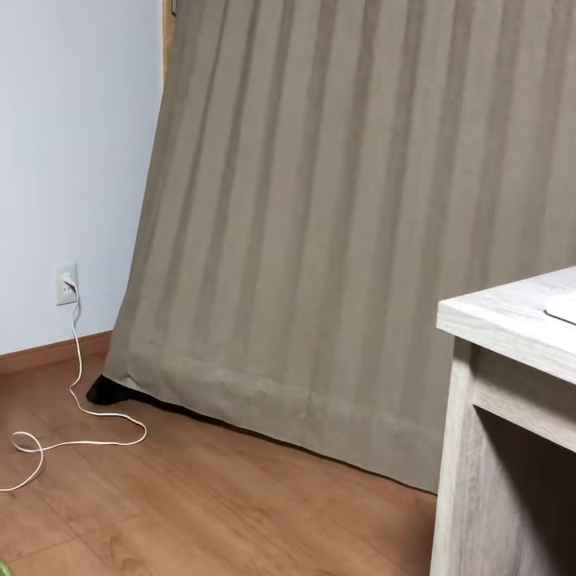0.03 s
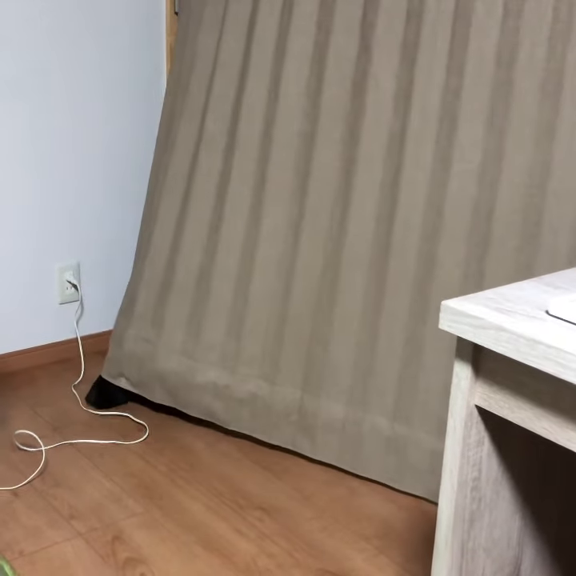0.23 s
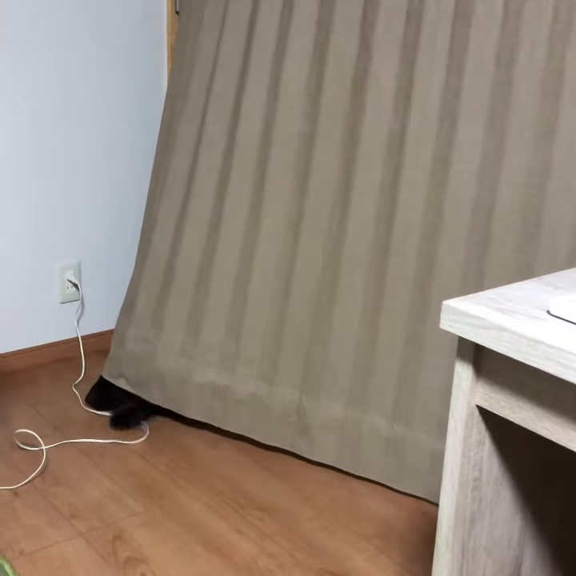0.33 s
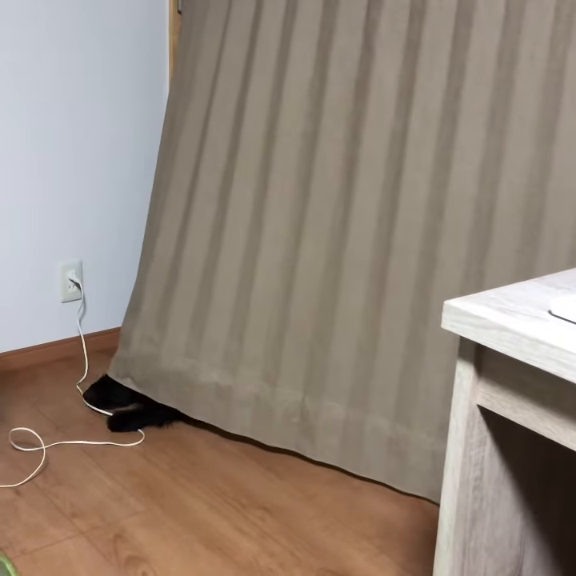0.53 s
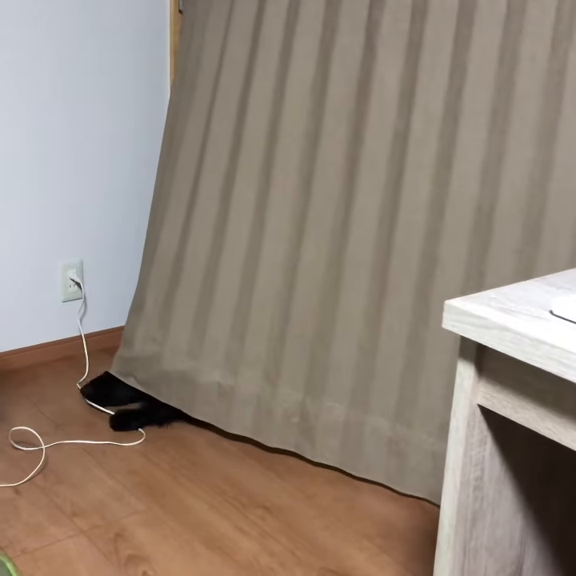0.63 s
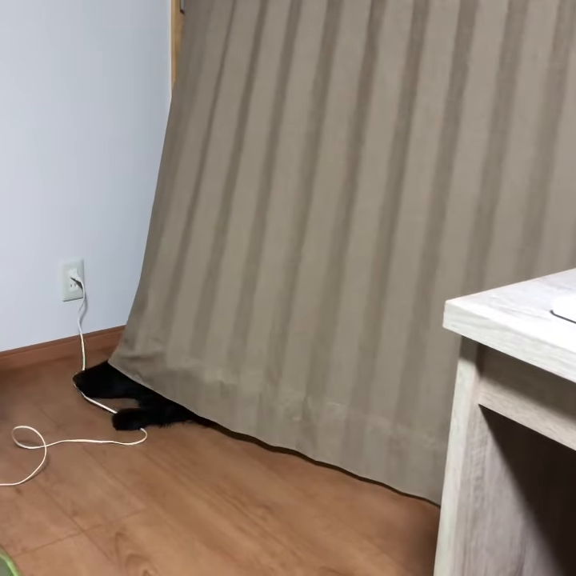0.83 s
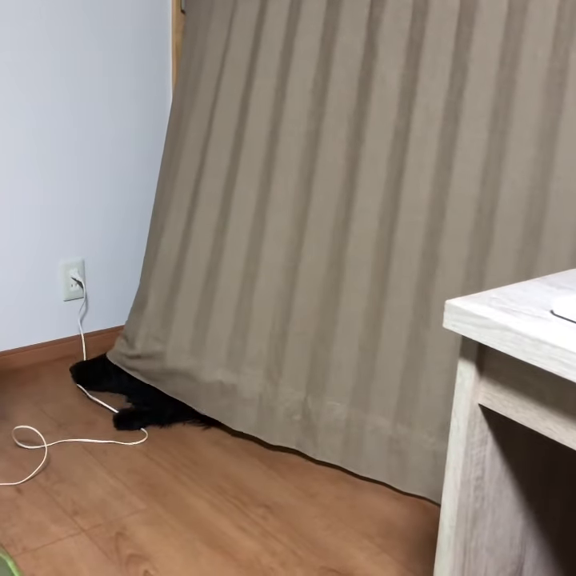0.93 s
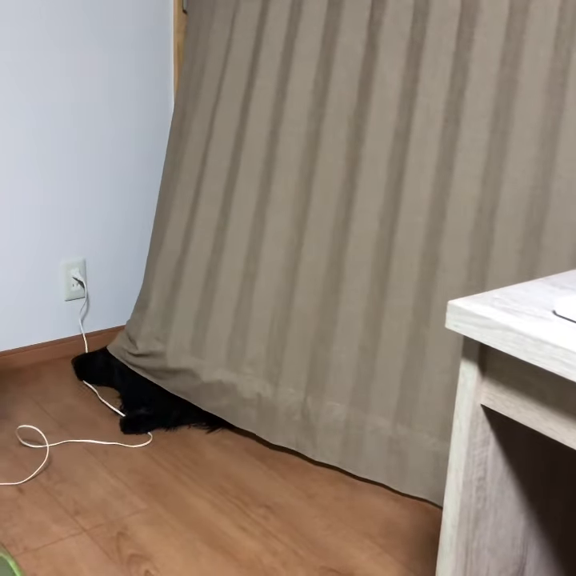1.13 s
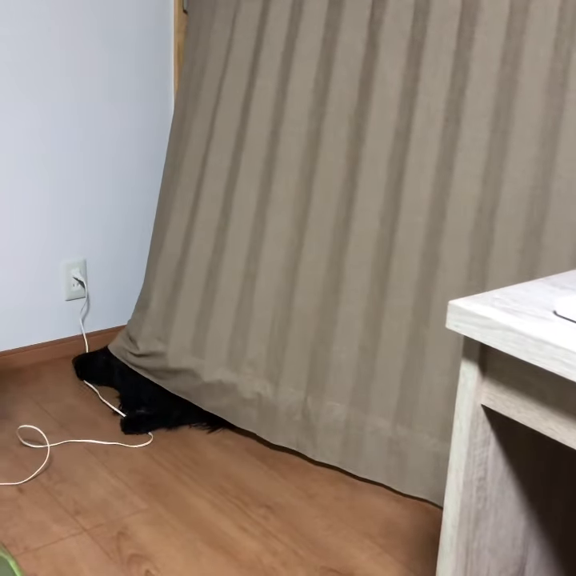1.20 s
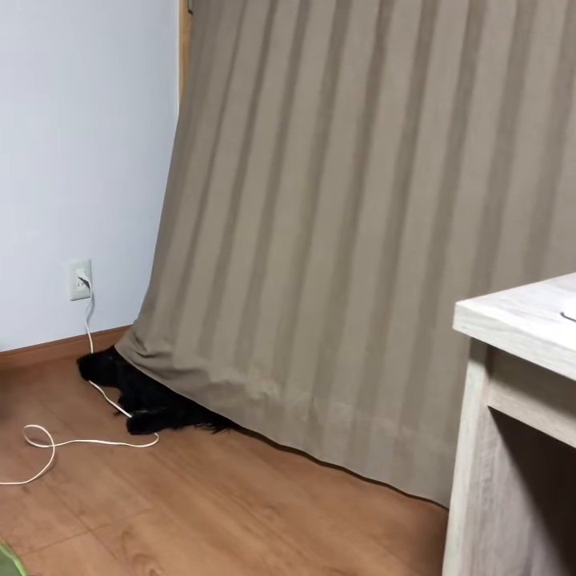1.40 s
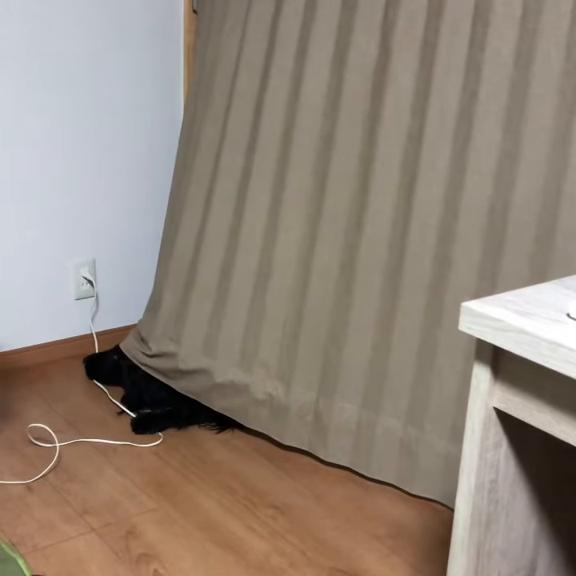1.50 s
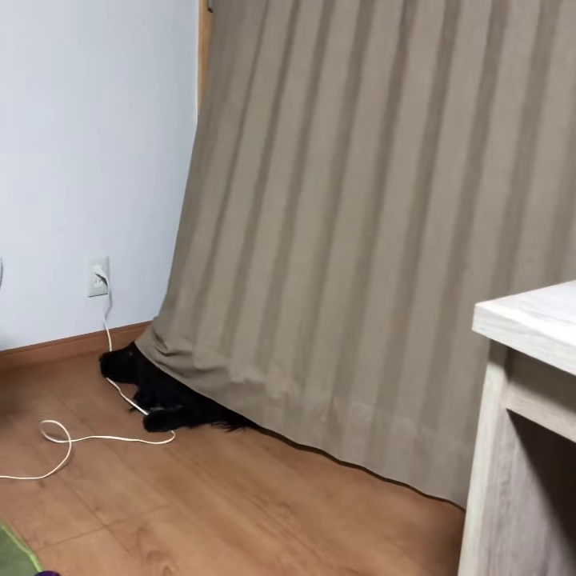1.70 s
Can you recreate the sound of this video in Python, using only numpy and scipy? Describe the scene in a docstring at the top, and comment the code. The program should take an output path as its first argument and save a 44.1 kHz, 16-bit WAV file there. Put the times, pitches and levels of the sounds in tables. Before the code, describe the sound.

Soft curtain rustling and low rubbing come from a dog squeezing under the cloth, close to the microphone in a quiet room. A sharp clack with a short rattle stands out, then gentle floor bumps, swishes and one paw step.

```python
"""A dog shoves its way under a heavy pleated curtain, heard from one microphone nearby in a small
room with a wooden floor. Cloth drags over its coat, folds swish and shudder, paws scuff, and its
body rubs and bumps the boards. Something hard behind the curtain is knocked with one sharp clack
and rattles briefly. A paw lands at the end; quiet room tone lies under it all."""
import sys
import numpy as np
from scipy import signal
from scipy.fft import rfft, irfft
from scipy.io import wavfile
from scipy.ndimage import uniform_filter1d

SR = 44100
rng = np.random.default_rng(int(sys.argv[2]) if len(sys.argv) > 2 else 0)


def pcm_store(signal):
    """Save signal as 16-bit PCM."""
    levels = np.round(np.clip(np.atleast_2d(signal), -1, 1) * 32767)
    wavfile.write(sys.argv[1], SR, levels.astype(np.int16).T)


N = 77175


def cloth(walls, room_db=-4, scuff_decay_s=0.011):
    """The curtain drags over the dog's coat in tiny slips; its folds swish and the paws scuff."""
    # Strength of the drag. Each row: time in seconds, level in dB.
    drag_levels = [(0, -54.5), (0.06, -60.5), (0.11, -58), (0.16, -65), (0.25, -61.5), (0.32, -61.5),
                   (0.37, -52.5), (0.6, -64.5), (0.65, -62), (0.71, -69), (0.755, -58.5), (0.85, -61.5),
                   (0.97, -56.5), (1.02, -60), (1.13, -53.5), (1.21, -61), (1.26, -74), (1.75, -95)]
    # Spectrum of sliding cloth. Each row: frequency in Hz, relative level in dB.
    spectrum = [(100, -5.5), (300, -2), (600, 2.5), (1100, 1), (2000, -2.5), (4000, -5.5), (6500, -10.5),
                (9000, -14.5), (15500, -17)]
    # Swishing folds. Each row: peak time and half width in seconds, level in dB, band centre in Hz,
    # fall away from it in dB per octave squared.
    swishes = [(0.203, 0.027, -53.5, 2490, 0.1), (0.225, 0.011, -46, 2240, 2),
               (0.939, 0.043, -53.5, 1000, 0.5), (1.31, 0.026, -53, 3500, 0.15),
               (1.31, 0.026, -64.5, 14000, 2), (1.325, 0.023, -57, 694, 3), (1.526, 0.021, -61.5, 6000, 0),
               (1.535, 0.016, -57.5, 950, 4.5), (1.745, 0.042, -57, 1200, 0.2)]
    # Paw scuffs. Each row: start in seconds, level in dB, band centre in Hz.
    scuffs = [(0.333, -51.5, 890), (1.692, -43.5, 450)]
    t = seconds()
    out = gain_curve(drag_levels) * through(friction(), colour(spectrum))
    for peak, width, db, hz, fall_db in swishes:
        swell = undb(db) * np.exp(-((t - peak) / width) ** 2)
        out += swell * through(friction(), colour(spectrum, hz, fall_db))
    for start, db, hz in scuffs:
        scuff = np.exp(-t / scuff_decay_s) * friction()
        out += undb(db) * delay(through(scuff, colour(spectrum, hz, fall_db=3)), start)
    return (out + undb(room_db) * through(out, walls)) / np.hypot(1, undb(room_db))


def curtain_shudder():
    """The hanging curtain trembles around one deep pitch as it is shoved."""
    # Shudders. Each row: start and length in seconds, level in dB.
    shudders = [(0.407, 0.068, -41.5), (0.522, 0.045, -43.5), (0.697, 0.17, -51), (0.88, 0.047, -57)]
    return tremble(shudders, hz=59.2, attack_s=0.0053, release_s=0.048)


def clacks(gain_db=-5, ring_db=-12, buzz_decay_s=0.0031, buzz_lag_s=0.0001):
    """Each hard contact is a clean snap and a brief buzz, with the object's ring and the room's echo."""
    # Clack, rattle and claws. Each row: start in seconds, relative level in dB, band centre in Hz,
    # fall away from it in dB per octave squared (sign ignored), buzz and room in dB against the snap.
    contacts = [(0.2073, -21.5, 1260, 6, 6, 0.5), (0.3334, -37, 9000, 2.5, 3, 5),
                (0.3928, 3, 5170, 0.5, -1, 1.5), (0.3950, -1, 3280, 0.5, -4, 0),
                (0.3994, -5.5, 4480, -0.04, -7, 0), (0.4035, -7, 2800, 0.5, 0.5, -1.5),
                (0.4114, -5.5, 5800, 0.7, 3, -0.5), (0.453, -8, 5570, 1.5, -4, -4),
                (0.4556, -15, 3400, 2, 0, -2), (0.5122, -13, 11500, 1.6, 0, -1.5),
                (0.5171, -16, 2300, 2.8, 4, 2.5), (1.174, -30.5, 3830, 9, 1, 5),
                (1.6908, -31.5, 2010, 0.8, 5, 3.5)]
    # Modes of the knocked object. Each row: frequency in Hz, relative level in dB, t60 in seconds.
    object_modes = [(1130, 0, 0.14), (3312, -0.5, 0.22), (3740, -2, 0.18), (5385, -5, 0.16),
                    (6810, -5, 0.13)]
    # Spectrum of a hard contact. Each row: frequency in Hz, relative level in dB.
    spectrum = [(60, -8.5), (280, 3), (480, 6.5), (720, -7.5), (1100, 1.5), (1500, -0.5), (2000, -6),
                (2500, -1), (3300, -0.5), (3800, 0.5), (4400, -2.5), (5300, 1), (7000, -4.5), (9500, -10),
                (15500, -12)]
    t, ringing, out = seconds(), ring(object_modes), 0
    snap = t == 0
    for start, db, hz, fall_db, buzz_db, room_db in contacts:
        buzz = unit_energy(np.exp(-t / buzz_decay_s) * rng.standard_normal(N))
        contact = unit_energy(snap + undb(buzz_db) * delay(buzz, buzz_lag_s))
        at_mic = contact + undb(ring_db) * ringing + undb(room_db) * room()
        out += undb(db) * delay(through(at_mic, colour(spectrum, hz, fall_db)), start)
    return undb(gain_db) * out


def floor_bumps(walls, gain_db=-32.5, boom_db=0.5, room_db=-7, rise_cycles=0.64):
    """The dog's soft bumps and the low thump under the clack set the boards booming."""
    # Bumps and thump. Each row: start in seconds, relative level in dB, pitch of the swing in Hz.
    bumps = [(0.211, -5.5, 180), (0.229, -8.5, 178.3), (0.393, -5, 442), (0.398, 3, 258),
             (0.416, -5.5, 157), (0.440, -3.5, 162), (0.703, -10, 142), (0.723, -11, 110),
             (0.769, -5.5, 174), (0.797, -6.5, 145), (0.848, -14.5, 122), (1.694, -9, 291)]
    # Modes of boards and room. Each row: frequency in Hz, relative level in dB, t60 in seconds.
    board_modes = [(112.2, 1.5, 0.55), (159, -3.5, 0.31), (182.7, 7, 0.16), (224, 2.5, 0.059),
                   (297, -1.5, 0.43), (401, -3, 0.61), (452, 5, 0.74), (484, 9, 0.45)]
    t, boards, out = seconds(), ring(board_modes), 0
    for start, db, hz in bumps:
        age = hz * t / rise_cycles
        swing = np.sin(2 * np.pi * hz * t) * age * np.exp(1 - age)  # heavily damped
        boom = unit_energy(through(swing, boards)) * np.sqrt(np.sum(swing ** 2))
        out += undb(db) * delay(swing + undb(boom_db) * boom, start)
    return undb(gain_db) * (out + undb(room_db) * through(out, walls))


def body_rub():
    """The dog's weight slides along curtain and floor with a low rumble, juddering now and then."""
    # Strength of the rub. Each row: time in seconds, level in dB.
    rub_levels = [(0, -54.5), (0.09, -70), (0.14, -53), (0.36, -57), (0.65, -56.5), (0.95, -57.5),
                  (1.07, -58.5), (1.24, -60), (1.3, -61.5), (1.45, -69.5), (1.57, -59), (1.66, -68),
                  (1.75, -51.5)]
    # Spectrum of the rub. Each row: frequency in Hz, relative level in dB.
    spectrum = [(40, -13), (60, -18), (85, -13), (112, -1), (140, -9), (180, -1), (215, -4), (290, -12),
                (450, -16), (700, -28), (1500, -44.5)]
    # Judders on the boards. Each row: start and length in seconds, level in dB.
    judders = [(0.118, 0.05, -53), (1.02, 0.07, -57), (1.172, 0.055, -52)]
    rumble = gain_curve(rub_levels) * through(friction(), colour(spectrum))
    return rumble + tremble(judders, hz=181, attack_s=0.0066, release_s=0.03)


def friction(slips_per_s=9000, spread_db=2.5):
    """Sliding surfaces catch and let go in dense tiny slips of uneven size."""
    slips = rng.random(N) < slips_per_s / SR
    return unit_rms(slips * rng.standard_normal(N) * undb(spread_db * rng.standard_normal(N)))


def tremble(spells, hz, attack_s, release_s, waver_share=0.04, waver_db=1.8):
    """Spells of low vibration that waver in pitch and strength."""
    t, out = seconds(), 0
    for start, length, db in spells:
        attack = np.clip((t - start) / attack_s, 0, 1)
        release = np.clip(1 - (t - start - length) / release_s, 0, 1)
        pitch = hz * (1 + waver_share * drift())
        cycles = np.cumsum(pitch * (t >= start)) / SR
        out += undb(db + waver_db * drift()) * attack * release * np.sin(2 * np.pi * cycles)
    return out


def room(build_s=0.0012, echo_spread_db=4.5, merge_s=0.08, echo_samples=24):
    """Uneven reflections off the near walls merge into a diffuse tail; each octave has its own decay."""
    # Reverberation of the small room. Each row: frequency in Hz, t60 in seconds.
    decay_times = [(100, 0.35), (500, 0.33), (1500, 0.35), (4000, 0.25), (8000, 0.25), (15000, 0.27)]
    t, tail, lowest_hz = seconds(), 0, 32
    echoes = np.repeat(rng.standard_normal(N // echo_samples + 1), echo_samples)[:N].clip(-2, 2)
    unevenness = undb(echo_spread_db * echoes * np.exp(-t / merge_s))
    spectrum = rfft(rng.standard_normal(N) * unevenness)
    hz = np.arange(len(spectrum)) * SR / N
    octave = np.log2(np.clip(hz, lowest_hz, 16384) / lowest_hz)
    for k in range(10):
        band = irfft(spectrum * np.maximum(1 - abs(octave - k), 0), N)
        t60 = at_hz(decay_times, lowest_hz * 2 ** k)
        tail += band * np.exp(-np.log(1000) * t / t60)
    return unit_energy(tail * (1 - np.exp(-t / build_s)))


def room_tone(level_db=-63):
    """The quiet room around the microphone: steady noise, strongest in the bass."""
    # Spectrum of the room tone. Each row: frequency in Hz, relative density in dB.
    spectrum = [(25, -35), (60, 6), (110, -2), (250, 2), (500, -3.5), (1000, -5.5), (2000, -17),
                (5000, -20.5), (10000, -28.5), (16000, -32)]
    return undb(level_db) * through(rng.standard_normal(N), colour(spectrum))


def ring(modes):
    """Response of a struck body: a sum of decaying modes."""
    t = seconds()
    return unit_energy(sum(undb(db) * np.sin(2 * np.pi * hz * t) * np.exp(-np.log(1000) * t / t60)
                           for hz, db, t60 in modes))


def colour(spectrum, centre_hz=1000, fall_db=0, size=8192):
    """Unit-energy response with this spectrum, less fall_db per octave squared away from a centre."""
    hz = np.maximum(np.arange(size // 2 + 1) * SR / size, spectrum[0][0])
    cut_db = np.minimum(abs(fall_db) * np.log2(hz / centre_hz) ** 2, 50)
    cepstrum = irfft(np.log(undb(at_hz(spectrum, hz) - cut_db)))
    # Minimum phase: nothing sounds ahead of the contact.
    cepstrum[1:size // 2] *= 2
    cepstrum[size // 2 + 1:] = 0
    return unit_energy(irfft(np.exp(rfft(cepstrum))))


def drift(turns_per_s=45):
    """Slow random wander with rms 1."""
    hold = int(SR / turns_per_s)
    steps = np.repeat(rng.standard_normal(N // hold + 1), hold)
    return unit_rms(uniform_filter1d(steps, hold)[:N])


def gain_curve(points):
    """Gain over time from (seconds, dB) points."""
    return undb(np.interp(seconds(), *np.array(points).T))


def at_hz(points, hz):
    """Reads (Hz, value) points on a log-frequency axis."""
    freqs, values = np.array(points).T
    return np.interp(np.log(np.maximum(hz, 1)), np.log(freqs), values)


def undb(db):
    return 10 ** (np.asarray(db) / 20)


def unit_rms(x):
    return x / np.sqrt(np.mean(x ** 2))


def unit_energy(x):
    return x / np.sqrt(np.sum(x ** 2))


def seconds():
    return np.arange(N) / SR


def through(x, response):
    return signal.fftconvolve(x, response)[:N]


def delay(x, lag_s):
    return np.concatenate([np.zeros(max(int(lag_s * SR), 0)), x, np.zeros(N)])[:N]


def scene():
    """Dog, curtain, knocked object and room meet at the microphone in one channel."""
    walls, air = room(), room_tone()
    return (clacks() + floor_bumps(walls) + curtain_shudder() + cloth(walls) + body_rub() + air)[None]


def record(dry, low_cut_hz=42, top_hz=15900):
    """The microphone loses the deepest bass and the very top."""
    low_cut = signal.butter(4, low_cut_hz, "high", fs=SR, output="sos")
    high_cut = signal.ellip(8, .2, 70, top_hz, fs=SR, output="sos")
    return signal.sosfilt(high_cut, signal.sosfilt(low_cut, dry))


dry = scene()
out = record(dry)
pcm_store(out)
```